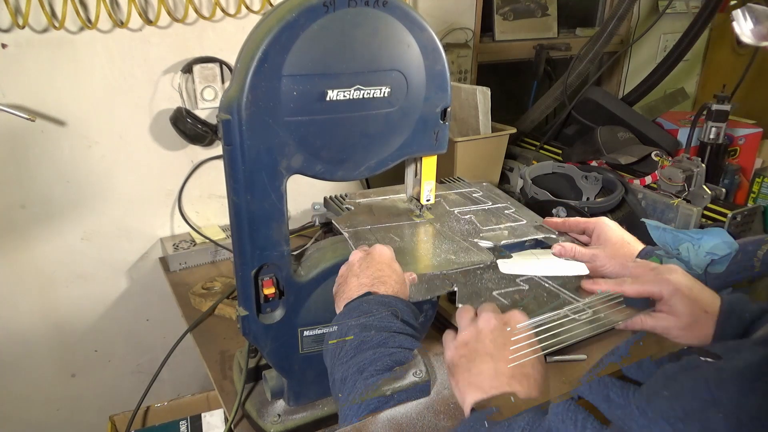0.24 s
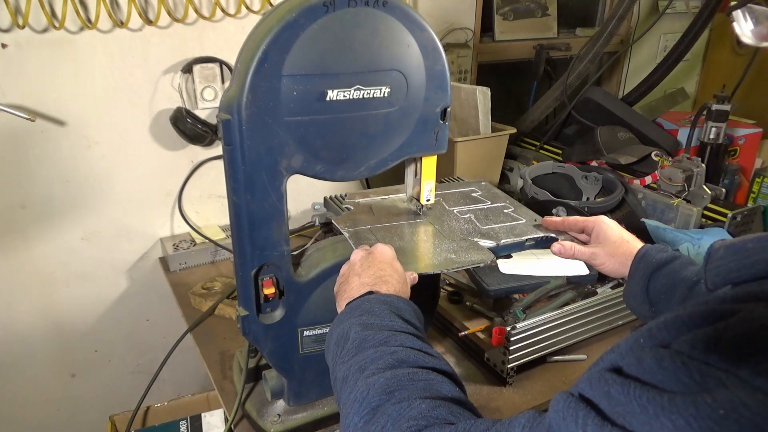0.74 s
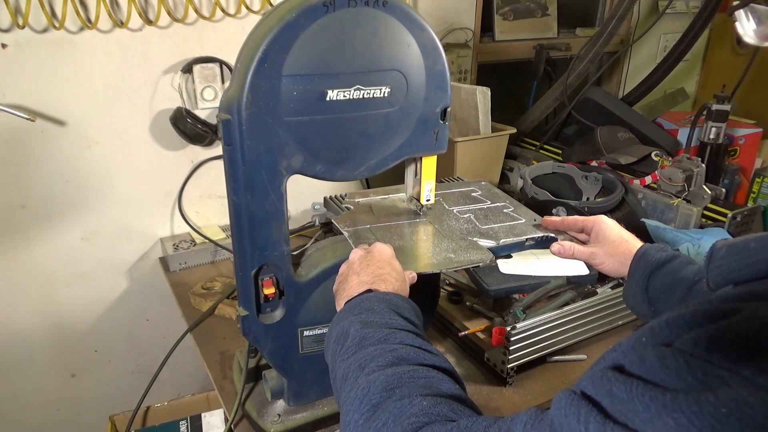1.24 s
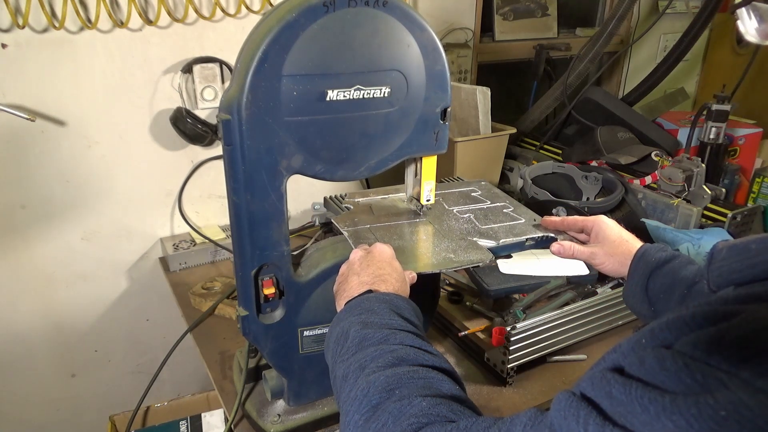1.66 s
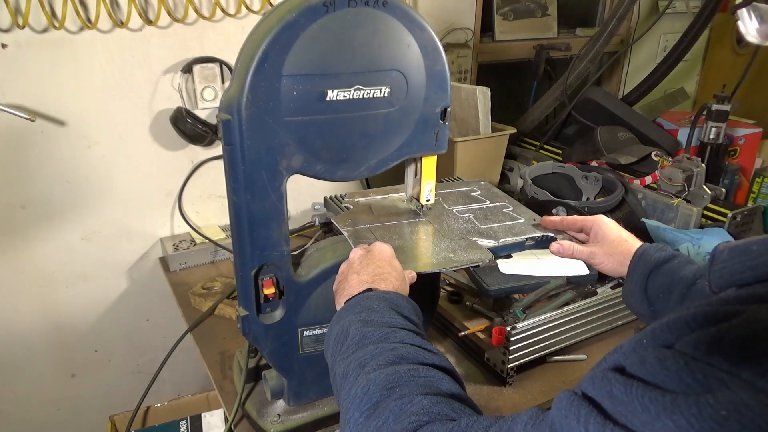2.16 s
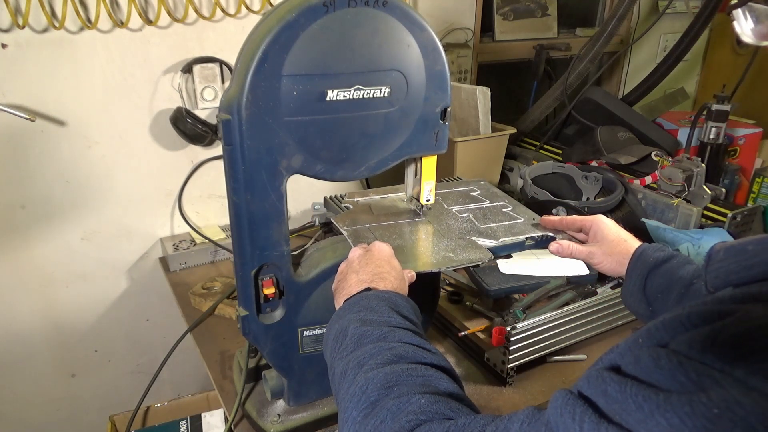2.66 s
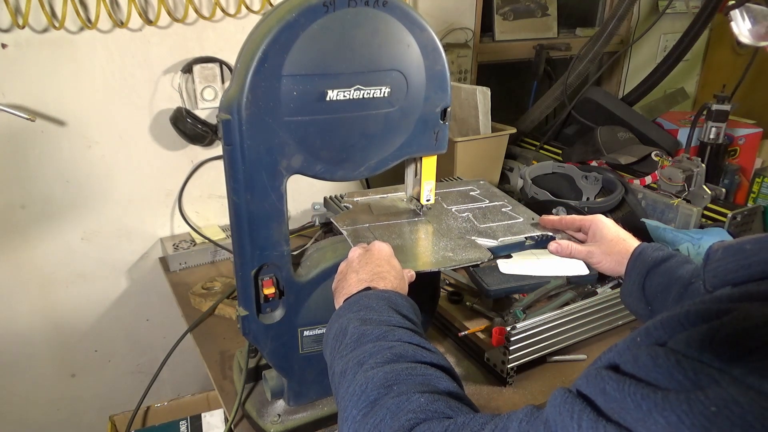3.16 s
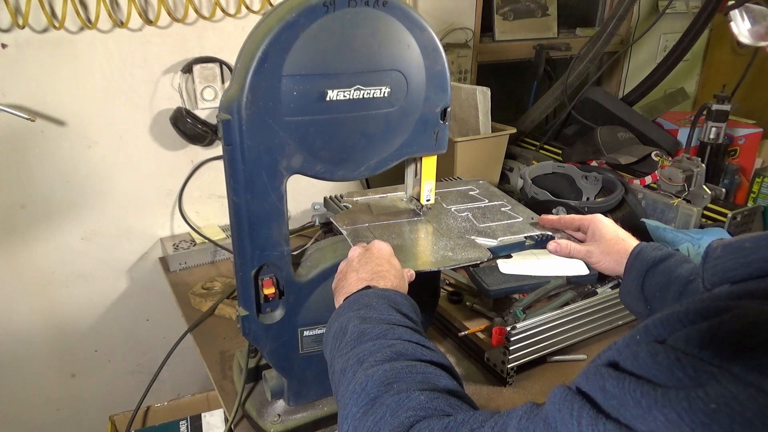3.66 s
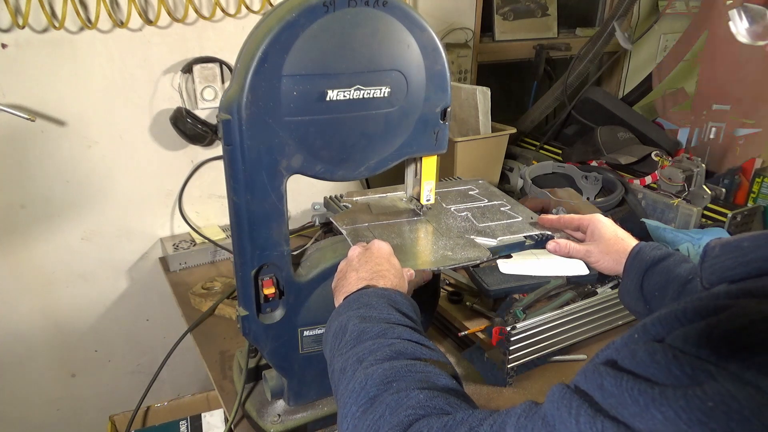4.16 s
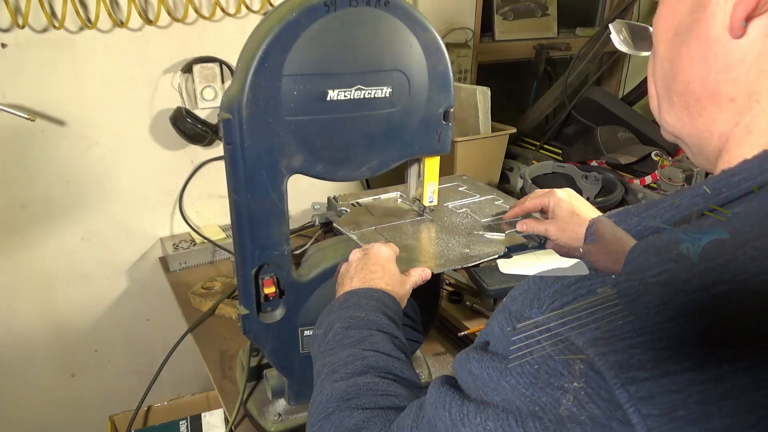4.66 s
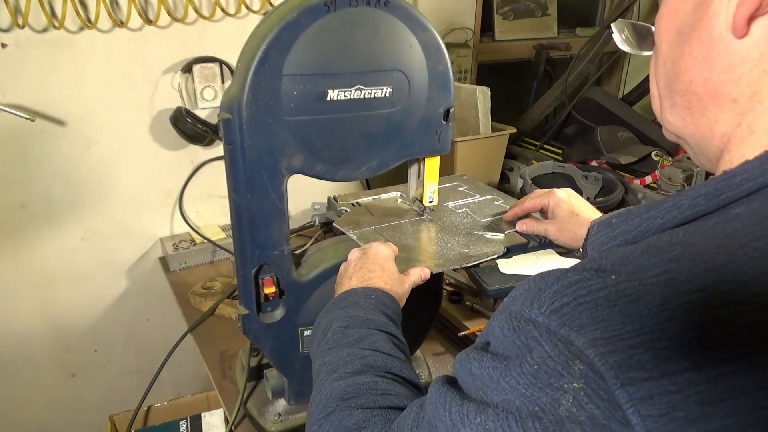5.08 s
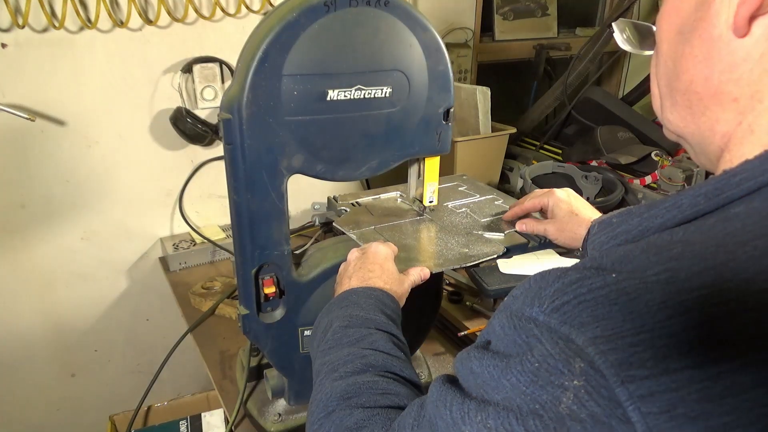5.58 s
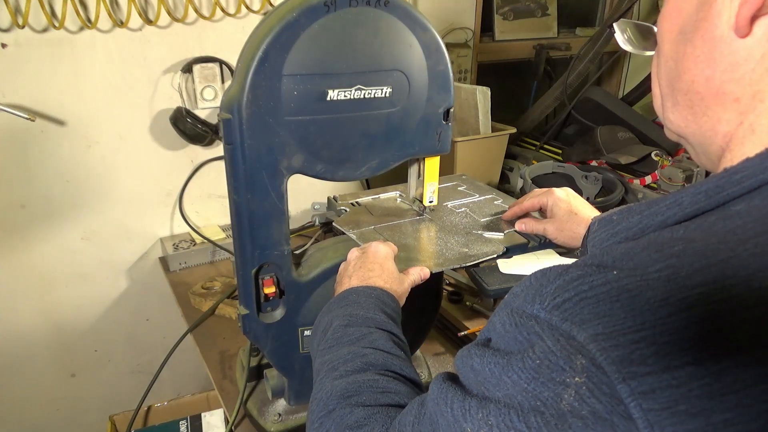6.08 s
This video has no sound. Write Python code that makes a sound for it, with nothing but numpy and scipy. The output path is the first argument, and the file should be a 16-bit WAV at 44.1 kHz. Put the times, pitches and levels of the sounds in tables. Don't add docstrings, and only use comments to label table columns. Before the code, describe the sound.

A benchtop bandsaw cuts thin aluminium sheet in a small garage: shrill metallic screech, wavering whine and a rapid rhythmic rattle over faint motor hum.

```python
import sys
import numpy as np
from scipy import signal
from scipy.fft import rfft, irfft, next_fast_len
from scipy.io import wavfile
from scipy.ndimage import uniform_filter1d

SR = 44100
rng = np.random.default_rng(int(sys.argv[2]) if len(sys.argv) > 2 else 0)


def to_wav(s):
    ch = np.atleast_2d(s).T
    pcm = np.round(np.clip(ch, -1, 1) * 32767)
    wavfile.write(sys.argv[1], SR, pcm.astype(np.int16))


def decibels_to_gain(level_db):
    exponent = np.asarray(level_db, float) / 20
    return 10 ** exponent


N = 278271
SIZE = next_fast_len(N)
BIN_HZ = np.arange(SIZE // 2 + 1) * SR / SIZE + 1

# (frequency [Hz], level
# [dB])
HUM = [(0.0, -67), (.7, -65), (.95, -71), (1.3, -67), (1.45, -72), (1.9, -70), (2.05, -74), (2.3, -68),
       (2.5, -62), (4.1, -67.5), (4.7, -73), (4.82, -73), (4.9, -71), (5.0, -79), (5.2, -70.5),
       (6.31, -66.5)]
HUM_SPECTRUM = [(20, -44), (62, -17), (90, -13), (110, -11), (143, -6.5), (165, -8.5), (200, -11),
                (300, -51)]
# (time [s], level [dB])
DRONE = [(0, -80), (1.3, -95), (1.5, -92), (2.35, -81), (2.48, -68), (3.55, -69), (4.5, -74), (4.7, -81),
         (6.31, -86)]
# (frequency [Hz], side over mid [dB])
SIDE_SPECTRUM = [(60, -50), (200, -33), (400, -38.5), (700, -21.5), (1290, -9), (2380, -12.5), (4400, -15.5),
                 (8120, -11), (11000, -28.5), (15000, -31)]

# (time [s], tooth rate [Hz])
TOOTH_RATE = [
    [(0, 1086), (.32, 1070), (.97, 990), (1.01, 962), (1.14, 967), (1.34, 942), (1.44, 1014), (1.65, 1161),
     (1.76, 1181), (1.93, 1172), (2.08, 1153), (2.4, 1126.4), (2.56, 1119.8), (3.04, 1122.5),
     (3.36, 1133.8), (3.84, 1141.5), (4.0, 1139.6), (4.6, 1088)],
    [(4.2, 1225), (4.52, 1170), (4.68, 1151.5), (4.84, 1145), (5.16, 1144), (5.48, 1156), (5.8, 1163),
     (6.12, 1152), (6.31, 1160)],
]
# (time [s], level [dB])
STRIKE = [
    [(0, -61), (.32, -48), (1.3, -49), (1.5, -49), (1.7, -47), (1.98, -49), (2.1, -45.5), (2.6, -46),
     (4.1, -51), (4.6, -53)],
    [(4.2, -57), (4.5, -58), (5.2, -49.5), (5.5, -45.5), (5.8, -48), (6.31, -51)],
]
# (multiple [1], level [dB])
OVERTONES = [
    [(1, -3.5), (2, 3), (4, -14), (3, 2.5), (5, 1.5), (6, -0.5), (7, 0), (8, -1), (9, -1.5), (10, -6.5)],
    [(1, -9), (2, -1), (4, -4), (.75, -3), (2.5, 3.5), (3, -2), (5, -5), (6, -17), (7, -20), (8, 3), (9, 0)],
]
# (start [s], end [s], multiple [1], level [dB])
SQUEALS = [
    [(.08, .34, 2, -56), (.45, .65, 1, -48), (.59, .95, 2, -51), (.97, 1.43, 2, -42), (.995, 1.09, 2, -50),
     (1.33, 1.42, 5, -42), (1.38, 1.52, 6, -38), (1.48, 1.6, 3, -45), (1.735, 1.9, 4, -28.5),
     (1.92, 2.5, 4, -42), (2.01, 2.48, 2, -53), (2.27, 2.34, 2, -36), (2.2, 4.12, 1, -48),
     (2.35, 3.1, 1, -52), (2.7, 4.2, 2, -38.5), (2.8, 3.25, 2, -54), (3.0, 4.08, 5, -52),
     (4.25, 4.55, 4, -44)],
    [(4.3, 4.6, 1, -47), (4.55, 5.47, 1, -45), (4.65, 4.82, 2, -48), (4.9, 5.4, 4, -43),
     (5.45, 6.05, 2, -48), (5.6, 5.9, 3, -43.5), (5.65, 5.76, 2, -47), (5.7, 5.9, 1, -49),
     (5.7, 6.05, 4, -44)],
]

# (time [s], feed as ringing level [dB],
# looseness of grip [dB])
CUT = [(0, -29, -4), (.15, -30.5, -0.5), (.45, -29.5, -1), (.75, -27, 1), (1.0, -28, 0), (1.35, -27, 0.5),
       (1.55, -27.5, -2), (1.8, -27.5, -4.5), (2.25, -25.5, -6), (2.4, -26.5, 0), (3.0, -26.5, -1.5),
       (4.05, -27, -1.5), (4.2, -29, -2), (4.65, -30, -1), (5.05, -27.5, -0.5), (5.4, -28, -0.5),
       (6.31, -28, 3)]
PART_EDGES_HZ = [200, 600, 1700, 6700]
# (frequency [Hz], width [Hz], level [dB])
HOLD_START = ((-1., -.5), [(150, -16), (260, -6), (700, -12), (2300, -5.5), (4600, -4.5), (9000, -16),
              (11500, -13.5), (15800, -32)], [(240, 12, -1), (540, 53, -9), (880, 40, -14), (1860, 76, -9),
              (5560, 140, -2), (5600, 83, -6), (7500, 150, -8), (7760, 150, -3.5), (8000, 130, -4),
              (8600, 180, -7), (9100, 100, -5), (9300, 110, -4)])
HOLD_LOOSE = ((0.14, 0.43), [(150.0, -17), (215.0, -21), (260.0, -17), (450.0, -18), (700.0, -24.5),
              (1100.0, -13.5), (1600.0, -12.5), (2300.0, -5.5), (3300.0, -6), (4600.0, -6), (6200.0, -10),
              (7000.0, -13.5), (10000.0, -14.5), (15800.0, -31.5)], [(240, 7.1, -10), (288, 25, -10.5),
              (362, 19, -3.5), (548, 66, -13.5), (728, 66, -11.5), (990, 390, -10), (1330, 40, -10.5),
              (1830, 62, -5), (1946, 110, -6.5), (3145, 180, -2.5), (3485, 170, -2), (4400, 210, -6),
              (4760, 240, -1), (5380, 100, -3), (6200, 41, -1), (6250, 71, -14), (7440, 130, -8.5),
              (8900, 100, -24), (9300, 79, -24), (11420, 180, -18), (11600, 140, -13)])
HOLD_PRESSED = ((2.05, 2.5), [(150.0, -18), (215.0, -19.5), (260.0, -12), (450.0, -13.5), (700.0, -15.5),
                (1100.0, -6.5), (1600.0, -12), (2300.0, -6.5), (3300.0, -4), (4600.0, -7.5), (6200.0, -6.5),
                (7000.0, -11.5), (10000.0, -9.5), (15800.0, -26)], [(240, 9.7, -5), (291, 27, -9),
                (360, 78, -12), (756, 30, -4), (910, 21, 0), (1000, 46, -9), (1750, 23, -5),
                (2000, 120, -2.5), (1510, 52, -5), (2254, 170, -2), (3170, 130, -3), (4040, 110, -13),
                (4400, 50, -0.5), (4580, 260, 0.5), (5480, 110, -11), (5860, 200, -4), (5670, 130, -5),
                (6200, 130, -9), (6340, 190, -9), (7540, 170, -9), (7790, 100, -4), (8550, 86, -5.5),
                (9020, 58, -1), (9700, 90, -33), (10360, 83, -3), (11320, 160, -5.5)])
HOLD_TURNED = ((4.13, 4.91), [(150.0, -23), (215.0, -29), (260.0, -22.5), (450.0, -23.5), (700.0, -31.5),
               (1100.0, -20.5), (1600.0, -17), (2300.0, -8.5), (3300.0, -13), (4600.0, -11.5),
               (6200.0, -13), (7000.0, -13.5), (10000.0, -13.5), (15800.0, -31)], [(350, 150, -19),
               (566, 31, -19), (877, 270, -16.5), (1104, 27, -7), (2285, 81, -11.5), (2570, 33, -5),
               (2835, 120, -6.5), (3058, 55, -5), (3372, 134, -2.5), (3540, 54, -6), (4090, 230, -2),
               (4530, 66, -4.5), (5450, 240, -10), (5640, 160, -10.5), (5930, 49, -2.5), (6350, 87, -8),
               (6450, 150, -7.5), (7160, 47, -33), (9000, 120, -6), (8620, 100, -2), (8390, 150, -1.5),
               (9300, 99, -14), (10050, 160, -6), (10700, 36, -12), (11100, 80, -22), (11630, 150, -16)])
HOLDS = [HOLD_START, HOLD_LOOSE, HOLD_PRESSED, HOLD_TURNED]
# (frame [dB], sheet drumming [dB], sheet ringing [dB], chip hiss [dB])
PARTS_DB = [
    (-16.5, -8.5, -0.5, -2.5),
    (-17, -7.5, 0, -5),
    (-18.5, -8.5, 0, -6),
    (-22, -12, 1, -3),
]
LOOSE_SHARE = [0.47, 1, 0.028, 0.015]

# (first bite [s], last bite [s], clatter peak [dB])
TURNS = [
    (.4735, 4.3, -18),
    (5.066, 6.3, -23),
]
# (time [s], added clatter [dB], added lull [dB])
UNEVEN = [(.60, 1, -1), (1.0, 0.5, 1.5), (3.91, -2, -2), (4.14, 0, -1.5), (.73, 2, 2), (1.14, -0.5, 0),
          (1.28, -1, 3.5), (1.78, 4, -1), (1.9, -2, 0), (2.01, -3, -1), (2.13, -13, 2), (2.25, -4, -2),
          (2.48, 1.5, 3), (2.84, -3, 0), (2.96, 0.5, -0.5), (3.08, -0.5, -2), (3.2, -0.5, 0),
          (3.44, -2, -4), (3.79, -4.5, 3), (4.02, 2.5, 2), (4.26, -2, 2), (5.07, -3, 4), (5.18, -3, 2),
          (5.77, 2, 4), (5.88, 5, -3), (6.0, 1, 0), (6.22, 6, 2)]
# (time [s], clatter peak [dB], lull [dB])
STUMBLE = (5.357, -21, -8)
# (frequency [Hz], level [dB])
CLATTER = [(150, 4), (300, -10.5), (800, -6), (2200, 0.5), (3600, -3), (5000, -12), (8000, -39),
           (12000, -31)]
# (frequency [Hz], width [Hz], level [dB])
KNOCK = [(366, 12, -5.5), (751, 10.5, -10), (854, 9.7, 1.5), (1046, 20, -1), (1314, 25, -3), (1780, 21, -5),
         (1927, 32, 5.5), (3120, 43, 0)]
# (first [s], last [s], delay after bite [s], frequency [Hz], level [dB])
WELD_RINGS = [(.45, 1.5, .035, 355, -47), (.45, 1.5, 0.1, 348, -51), (.45, 1.6, .06, 1857, -40),
              (.55, .95, 0.032, 1830, -46), (1.5, 1.6, 0, 2050, -42), (2.3, 4.4, 0.07, 747, -45.5),
              (3.2, 4.15, .045, 860, -44), (2.3, 4.2, .012, 1046, -47.5), (2.3, 4.2, .034, 353, -54.5),
              (2.3, 5.1, 0.053, 348, -58), (2.3, 4.6, .05, 240, -64), (2.3, 4.2, .02, 1330, -47.5),
              (0, 1.5, .05, 240, -55.5), (5.0, 6.3, 0.037, 560, -54.5), (5.0, 6.3, .004, 2530, -46.5),
              (5.4, 6.3, .06, 854, -51)]
# (start [s], end [s], frequency [Hz], level [dB])
SHRIEKS = [(.67, 0.724, 6060, -45), (0.703, 0.797, 1015, -41), (0.826, 0.883, 1000, -42),
           (2.03, 2.12, 2310, -35), (4.66, 4.718, 1150, -36), (5.17, 5.253, 1147, -39),
           (.92, 0.997, 5900, -36), (1.546, 1.743, 5330, -41), (3.02, 3.042, 4400, -33),
           (3.06, 3.087, 5670, -36), (3.248, 3.323, 5700, -35), (3.38, 3.429, 4580, -33),
           (3.52, 3.6, 5700, -43), (3.63, 3.672, 5680, -34), (3.64, 3.68, 4560, -41),
           (3.7, 3.72, 5850, -36), (3.74, 3.79, 4565, -34), (3.81, 3.898, 4560, -36),
           (3.968, 4.02, 5720, -41), (4.096, 4.14, 5640, -36), (4.18, 4.212, 4420, -34),
           (4.23, 4.273, 5600, -37), (1.42, 1.503, 69.5, -66), (1.419, 1.55, 109, -68),
           (2.932, 3.01, 35, -72), (6.08, 6.16, 45, -74), (6.162, 6.24, 100, -68), (5.902, 6.15, 148, -68)]


def unit(x):
    return x / np.sqrt(np.mean(x ** 2))


def curve(table):
    s, *columns = np.transpose(table)
    return [np.interp(np.arange(N) / SR, s, c) for c in columns]


def shape(points):
    hz, db = np.transpose(points)
    return decibels_to_gain(np.interp(np.log(BIN_HZ), np.log(hz), db))


def colour(x, gain):
    return irfft(rfft(x, SIZE) * gain, SIZE)[:N]


def walk(rate, size=N):
    values = rng.standard_normal(8192)
    steps = np.interp(np.arange(size) * rate / SR, np.arange(8192), values)
    return unit(uniform_filter1d(steps, max(int(SR / rate), 1)))


def response_db(hz, broad, modes):
    broad_hz, broad_db = np.transpose(broad)
    power = decibels_to_gain(2 * np.interp(np.log(hz), np.log(broad_hz), broad_db))
    for f, width, db in modes:
        power = power + decibels_to_gain(2 * db) / (1 + (2 * (hz - f) / width) ** 2) ** 2
    return 10 * np.log10(power)


def bites():
    teeth_a_turn = 134.17
    t, rows = np.arange(0, N / SR, .001), []
    for table, (first_s, last_s, peak_db) in zip(TOOTH_RATE, TURNS):
        passed = np.cumsum(np.interp(t, *np.transpose(table))) * t[1]
        first_tooth = np.interp(first_s, t, passed)
        s = np.interp(first_tooth + teeth_a_turn * np.arange(64), passed, t)
        s = s[s < last_s]
        rows += zip(s, peak_db + 0 * s, 0 * s)
    rows = np.array(rows + [STUMBLE])
    for s, clatter_db, lull_db in UNEVEN:
        rows[np.argmin(abs(rows[:, 0] - s)), 1:] += clatter_db, lull_db
    return rows


def at_bites(size, kernel, lead):
    marks = np.zeros(N + lead)
    marks[(bites()[:, 0] * SR).astype(int)] = size
    return signal.fftconvolve(marks, kernel)[lead:lead + N]


def after_bites(size, rise_s, decay_s):
    t = np.arange(int(.15 * SR)) / SR
    return at_bites(size, (1 - np.exp(-t / rise_s)) * np.exp(-t / decay_s), 0)


def burst(start_s, length_s, hz, db, turn):
    t = np.arange(N) / SR
    first = int(np.clip(start_s * SR, 0, N - 1))
    u = t[first:first + int(length_s * SR)] - t[first]
    swell = np.sqrt(2) * decibels_to_gain(db) * np.sin(np.pi * u / length_s)
    out = np.zeros(N)
    out[first:first + len(u)] = swell * np.sin(2 * np.pi * (hz * u + turn))
    return out


def garage(x):
    t60_s = 0.12
    t = np.arange(int(.5 * SR)) / SR
    tail = rng.standard_normal(len(t)) * np.exp(-np.log(1000) * t / t60_s) * (t > .004)
    return signal.fftconvolve(x, tail / np.sqrt(np.sum(tail ** 2)))[:N]


def motor():
    hum = unit(colour(rng.standard_normal(N), shape(HUM_SPECTRUM)))
    hum = hum * decibels_to_gain(curve(HUM)[0] + 2.5 * walk(9))
    drone_hz = 82 * (1 + 0.012 * walk(6))
    drone = np.sin(2 * np.pi * np.cumsum(drone_hz) / SR)
    pulse_db = 9 * after_bites(1, rise_s=.008, decay_s=.055)
    return hum + decibels_to_gain(curve(DRONE)[0] + pulse_db) * drone


def weld_rings():
    ring_s = .05
    out, times = 0, bites()[:, 0]
    for first, last, delay, hz, db in WELD_RINGS:
        chance = rng.standard_normal((len(times), 2))
        for s, (scatter_db, turn) in zip(times, chance):
            if first < s < last:
                out = out + burst(s + delay - ring_s / 2, ring_s, hz, db + 2 + scatter_db, turn)
    return out


def knock(push_s, fresh):
    size, t = decibels_to_gain(bites()[:, 1]), np.arange(int(.1 * SR)) / SR
    shove = at_bites(size, rng.standard_normal(len(t)) * np.exp(-t / push_s), 0)
    shove = shove + fresh * rng.standard_normal(N) * after_bites(size, 0.0021, push_s)
    modes = sum(decibels_to_gain(db) / (1 + 2j * (BIN_HZ - hz) / width) for hz, width, db in KNOCK)
    return colour(shove, modes / (1 + (250 / BIN_HZ) ** 4))


def shrieks():
    return sum(burst(start, end - start, hz, db, 0) for start, end, hz, db in SHRIEKS)


def lull(width_s):
    k = int(4 * width_s * SR)
    approach = np.exp(np.arange(-k, 0) / (width_s * SR))
    return decibels_to_gain(at_bites(np.minimum(bites()[:, 2], 0), approach, k))


def frame_dip(x):
    half_s, early_s, top_hz = .03, 0.0014, 700
    k = int(half_s * SR)
    dip = decibels_to_gain(-5.5 * at_bites(0.84, np.hanning(2 * k), k + int(early_s * SR)))
    return x + (dip - 1) * colour(x, 1 / (1 + (BIN_HZ / top_hz) ** 6))


def clatter(ringing, rise_s, decay_s, crest_db, slack_db):
    s, peak_db, _ = bites().T
    cut_s, feed_db, _ = np.transpose(CUT)
    over_db = np.maximum(peak_db - crest_db - np.interp(s, cut_s, feed_db), 0)
    surge = decibels_to_gain(after_bites(over_db, rise_s, decay_s) + slack_db)
    return ringing + (surge - 1) * colour(ringing, shape(CLATTER))


def patchy(x, turn_db, flicker_db):
    _, _, z = signal.stft(x, nperseg=512)
    db = 0
    for spread_db, (bins, frames) in ((turn_db, (6, 16)), (flicker_db, (24, 4))):
        field = rng.standard_normal(z.shape)
        for _ in range(2):
            field = uniform_filter1d(field, bins, axis=0)
            field = uniform_filter1d(field, frames, axis=1)
        db = db + spread_db * unit(field)
    gain = decibels_to_gain(db) / np.sqrt(np.mean(decibels_to_gain(2 * db)))
    return signal.istft(z * gain, nperseg=512)[1][:N]


def sheet_gain(broad, modes, ripple_db, ripple_hz):
    ripple = walk(SR * SR / SIZE / ripple_hz, size=len(BIN_HZ))
    return decibels_to_gain(response_db(BIN_HZ, broad, modes) + ripple_db * ripple)


def sheet(tear_db, ripple_db, ripple_hz):
    above = [1 / (1 + (hz / BIN_HZ) ** 12) for hz in PART_EDGES_HZ] + [0]
    feed_db, loose_db = curve(CUT)
    out = 0
    for ((start, end), broad, modes), parts_db in zip(HOLDS, PARTS_DB):
        levels = decibels_to_gain(feed_db + np.c_[list(parts_db)] + np.c_[LOOSE_SHARE] * loose_db)
        chips = rng.standard_normal(N) * decibels_to_gain(tear_db * walk(900))
        ring = rfft(chips, SIZE) * sheet_gain(broad, modes, ripple_db, ripple_hz)
        parts = [unit(irfft(ring * np.sqrt(above[k] - above[k + 1]), SIZE)[:N]) for k in range(4)]
        share = np.clip((np.arange(N) / SR - start) / (end - start), 0, 1)
        out = out * np.sqrt(1 - share) + np.sqrt(share) * np.sum(levels * parts, axis=0)
    return out


def whine(rate, strike, overtones, squeals, hold, wobble, unsteady_db, resonance, flutter_db):
    hz, strike_db, t = curve(rate)[0], curve(strike)[0], np.arange(N) / SR
    braking = after_bites(0.888, 0.0038, 0.051)
    slip = .009 * (braking - np.mean(braking))
    phase = 2 * np.pi * np.cumsum(hz * (1 + wobble * walk(25) - slip)) / SR
    tone = 0
    for k, db in overtones:
        flare_db = np.repeat(response_db(k * hz[::64], *hold[1:]), 64)[:N]
        flare_db = resonance * (flare_db - np.mean(flare_db))
        gain = decibels_to_gain(strike_db + db + flare_db + unsteady_db * walk(21.28))
        for start, end, multiple, lock_db in squeals:
            if round(multiple) == k:
                fade_s = 0.0076 + 0.11 * (end - start)
                gain = gain + decibels_to_gain(lock_db) * np.clip(np.minimum(t - start, end - t) / fade_s, 0, 1)
        flutter = decibels_to_gain(flutter_db * np.sqrt(k) * walk(40))
        tone = tone + gain * flutter * np.sin(k * phase + k * k)
    fade_in = np.clip((t - rate[0][0]) / 0.054 + 1, 0, 1)
    fade_out = np.clip((rate[-1][0] - t) / 0.045 + 1, 0, 1)
    break_db = -11. * np.clip((hz - 1000) / 100, 0, 1) * after_bites(1.0, 0.0027, .014)
    return np.sqrt(2) * tone * fade_in * fade_out * decibels_to_gain(break_db)


def scene():
    teeth = sum(whine(*blade, wobble=0.000792, unsteady_db=2.1, resonance=0.42, flutter_db=1.02)
                for blade in zip(TOOTH_RATE, STRIKE, OVERTONES, SQUEALS, HOLDS[2:]))
    ringing = sheet(tear_db=1.06, ripple_db=1.25, ripple_hz=29.88)
    ringing = patchy(ringing, turn_db=0.17, flicker_db=0.77)
    ringing = clatter(ringing, rise_s=0.0042, decay_s=0.028, crest_db=1.5, slack_db=-5.0)
    cutting = (frame_dip(ringing) + teeth) * lull(width_s=0.012)
    saw = motor() + weld_rings() + knock(push_s=0.03, fresh=0.25) + shrieks() + cutting
    side = colour(garage(saw), shape(SIDE_SPECTRUM))
    mid = saw + decibels_to_gain(-15) * garage(saw)
    return np.array([mid + side, mid - side])


def top_cut(x):
    return signal.sosfilt(signal.butter(12, 15750, fs=SR, output="sos"), x)


def record(dry):
    return top_cut(dry)


dry = scene()
out = record(dry)
to_wav(out)
```